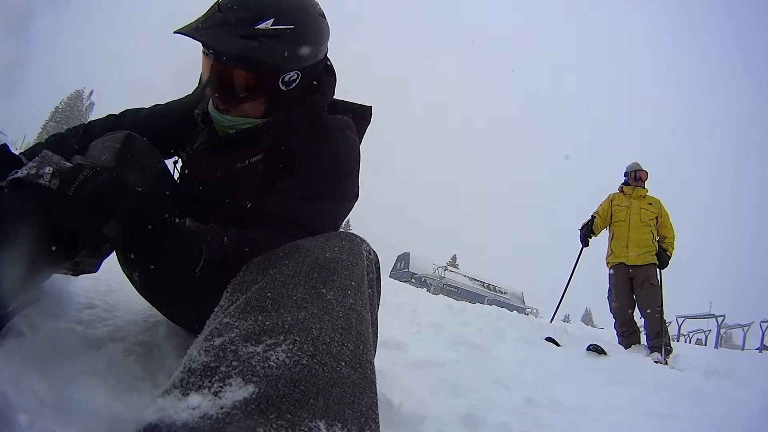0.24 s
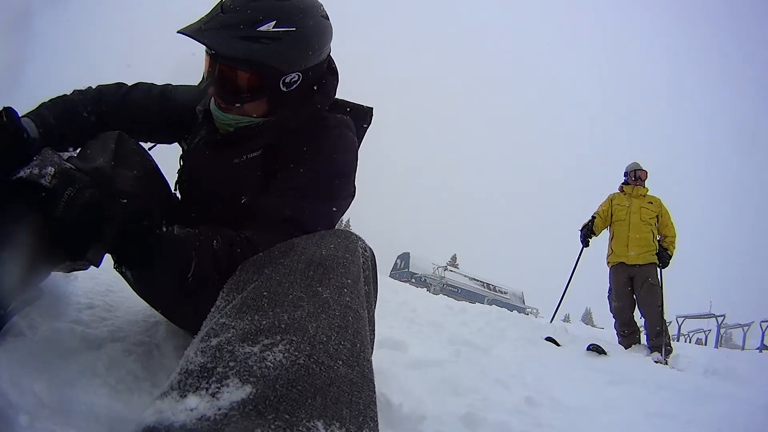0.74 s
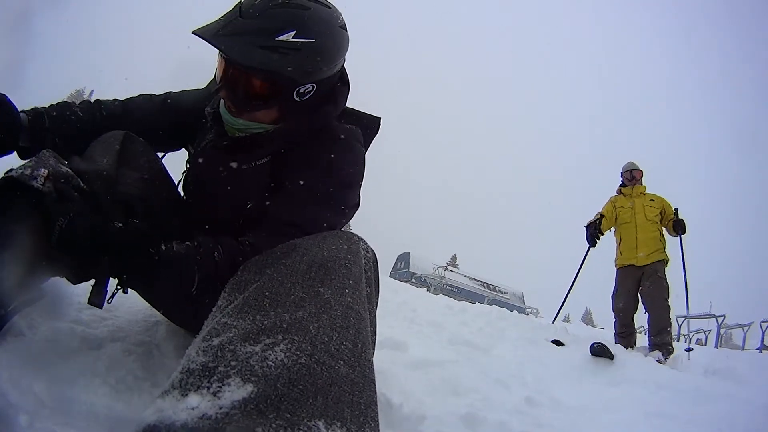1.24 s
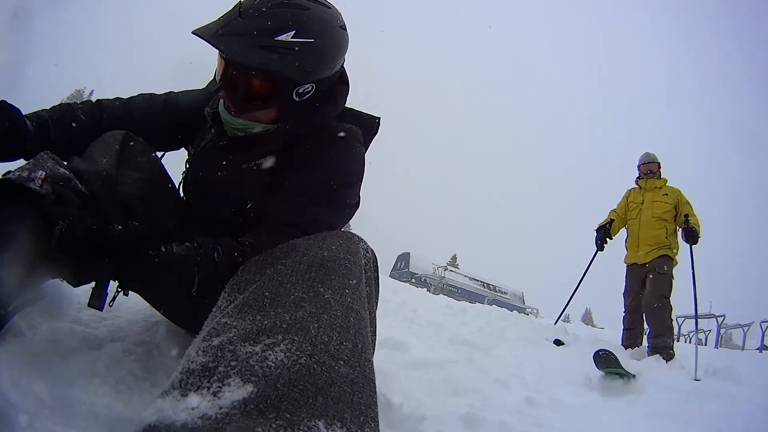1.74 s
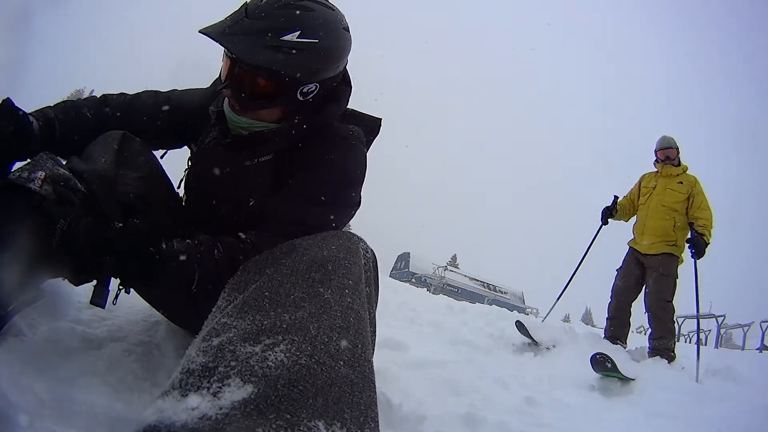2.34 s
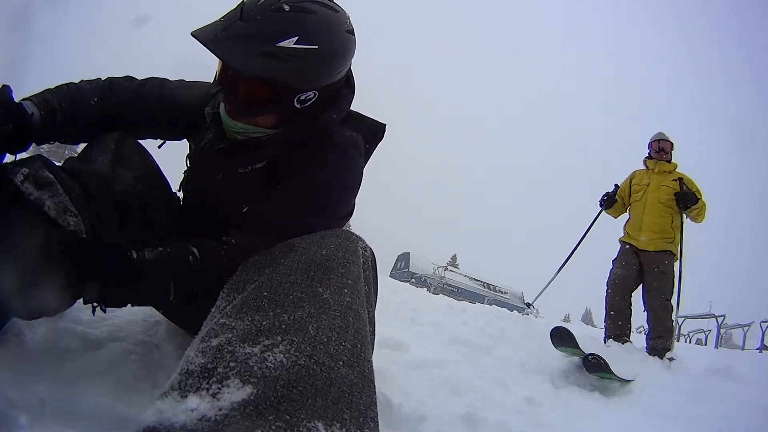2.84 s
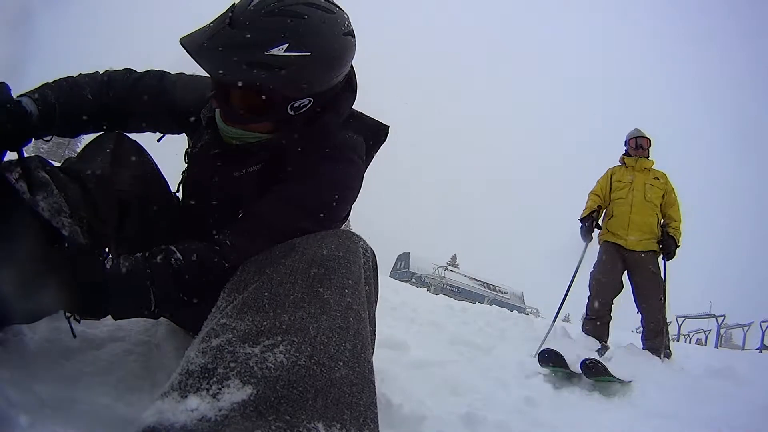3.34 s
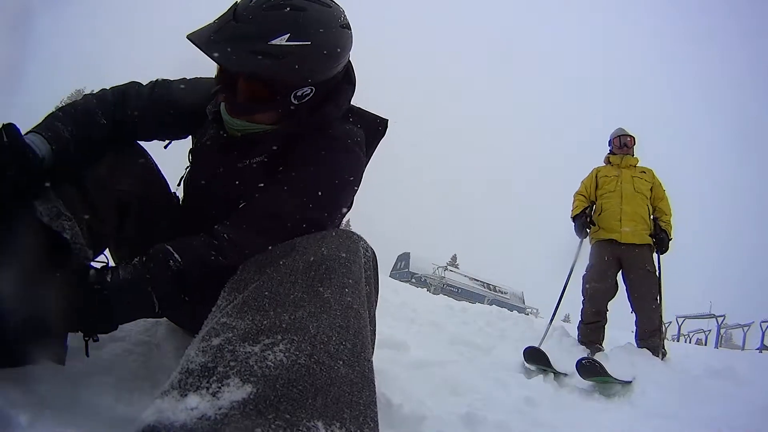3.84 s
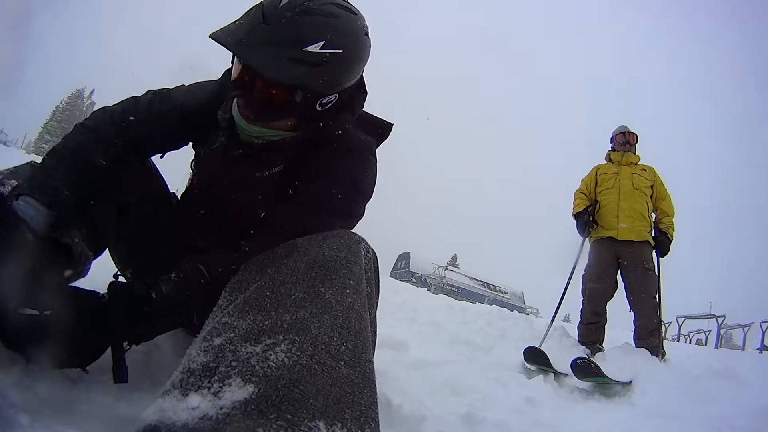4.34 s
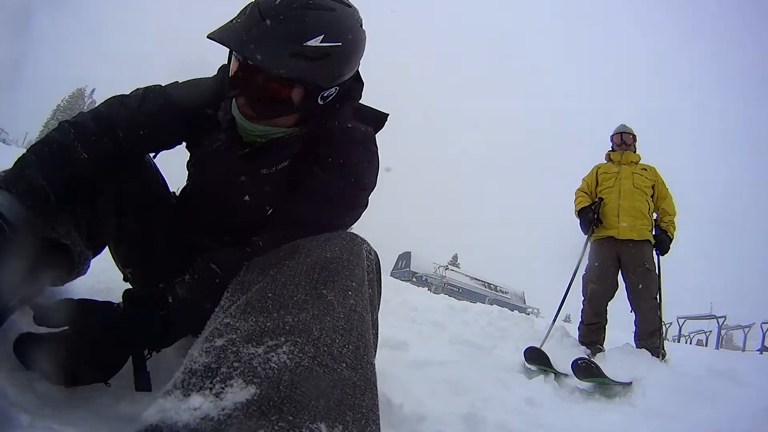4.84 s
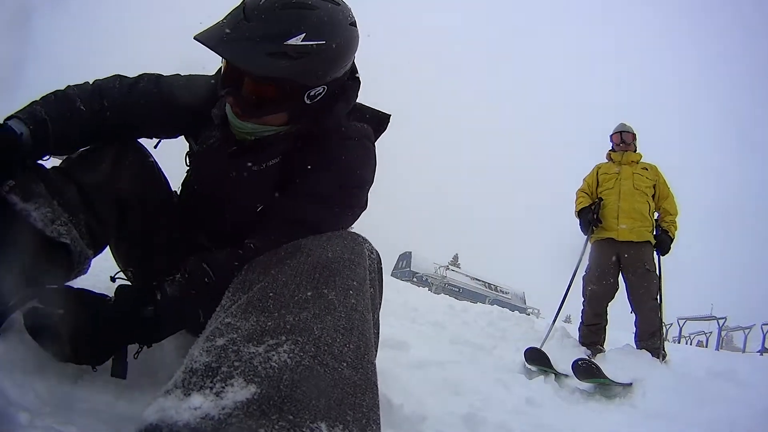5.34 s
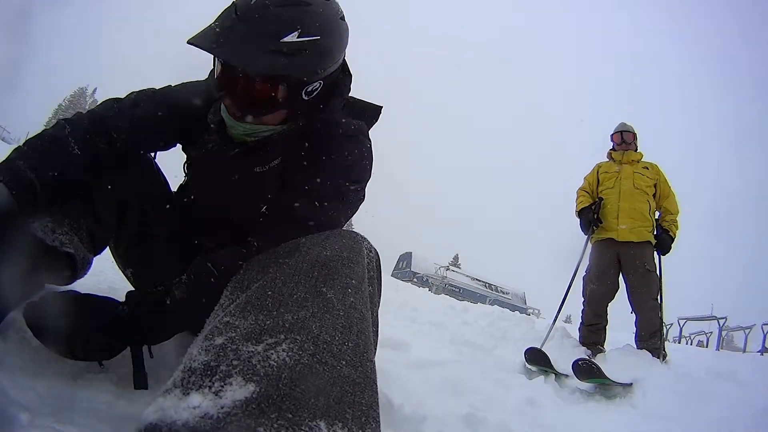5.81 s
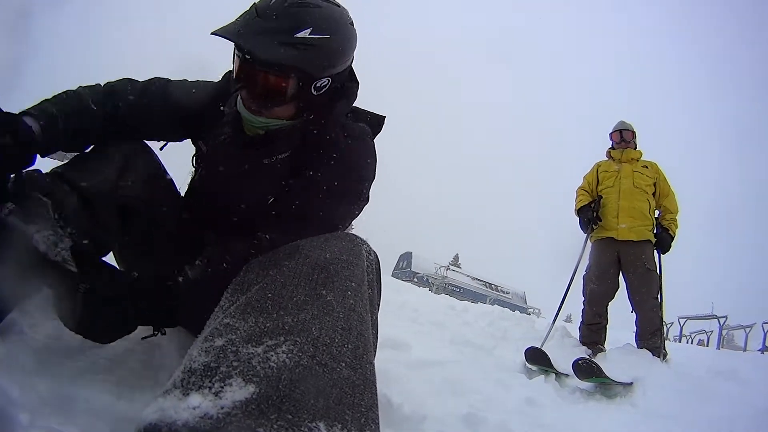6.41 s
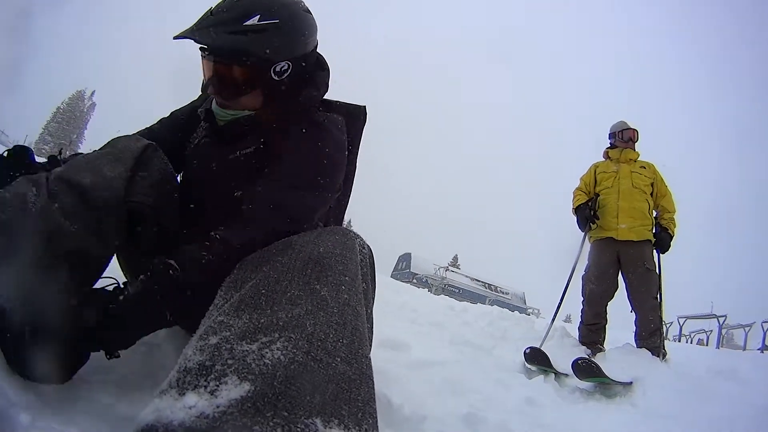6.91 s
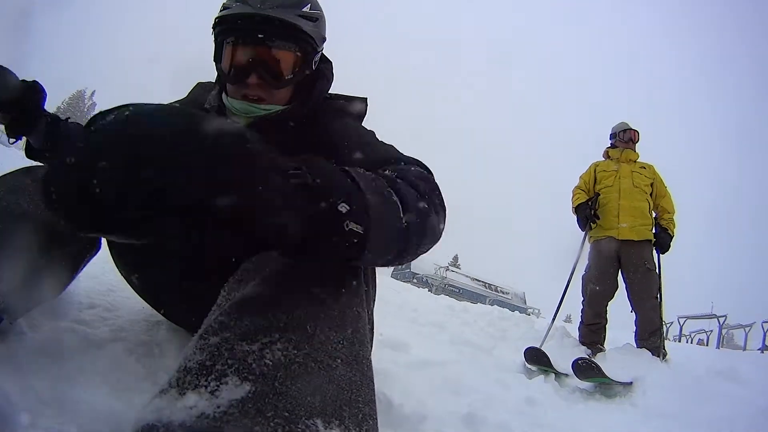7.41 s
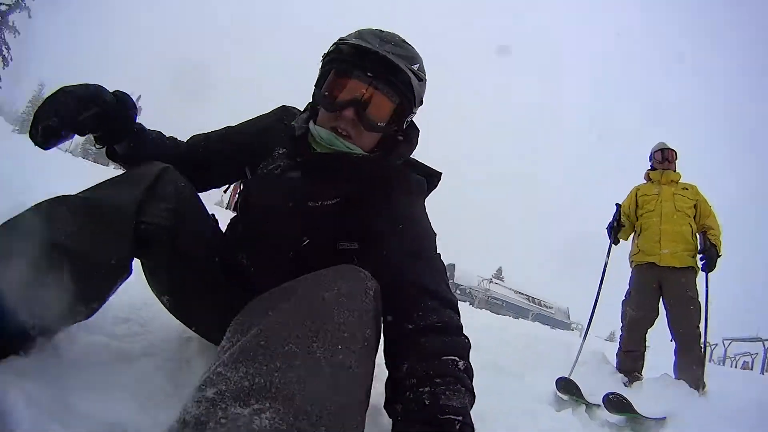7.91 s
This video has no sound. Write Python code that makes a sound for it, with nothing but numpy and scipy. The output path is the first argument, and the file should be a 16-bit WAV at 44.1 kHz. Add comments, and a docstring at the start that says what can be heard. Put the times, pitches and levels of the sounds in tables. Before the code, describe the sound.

Close, rough handling noise in snow: dull thumps, dry creaks, sharp plastic cracks, brief squeaks and jacket scuffs, quiet first, busier later.

```python
"""A snowboarder sits and shifts in deep snow, heard through a case fixed low to the gear; about 8 s.
Shoves crunch the snow, rub the case and drag the jacket; a squeak, knocks and ticking grains come early.
From 1.7 s the board judders in short runs, from 3 s snow creaks, and from 3.6 to 7.3 s plastic snaps.
Snow slumps at 5.8 and 7.8 s, a sleeve sweeps from 6.6 s, a glove brushes at 7.7 s, and grains flurry near 8 s.
Impulses and noise drive resonances of snow, board, mount, case and shell, over a faint coloured hiss."""
import sys
import numpy as np
from scipy import signal
from scipy.fft import rfft, irfft, next_fast_len
from scipy.io import wavfile
from scipy.ndimage import uniform_filter1d

SR = 44100
rng = np.random.default_rng(int(sys.argv[2]) if len(sys.argv) > 2 else 0)


def to_wav(s):
    """Save 16-bit WAV."""
    ch = np.atleast_2d(s).T  # columns
    pcm = np.round(np.clip(ch, -1, 1) * 32767)  # PCM
    wavfile.write(sys.argv[1], SR, pcm.astype(np.int16))


N = 359838
TIME = np.arange(N) / SR

# resonances of the snow beneath: centre_hz, width_hz, gain_db
SNOWPACK_MODES = [(47.6, 17, -0.5), (82.2, 20, 4), (122, 24.6, 7.5)]
# resonances of the loaded board: centre_hz, width_hz, gain_db
BOARD_MODES = [(141, 44, -5.5), (170.7, 29.4, 2), (223, 42, -0.5), (398.4, 89, -12.5)]
# resonances of the mount between board and case: centre_hz, width_hz, gain_db
MOUNT_MODES = [(479.6, 36, 1.5), (625.5, 64, 7), (745.5, 89, -1.5), (888, 41.5, -1.5), (1015, 43, -11),
               (1219, 92, -11.5)]
# resonances of the case when struck: centre_hz, width_hz, gain_db
STRUCK_CASE_MODES = [(1441, 74, 17.5), (1477, 410, 7.5), (1875, 123, 7), (2900, 600, -4.5)]
# resonances of the hard plastic shell: centre_hz, width_hz, gain_db
SHELL_MODES = [(1600, 360, 9), (2980, 210, 8), (4716, 470, 9.5), (5840, 910, -6.5), (6780, 790, -1.5),
               (8050, 2350, -1.5), (9390, 1500, -4.5)]


def effort():
    """Weight on the snow and rubbing on the case, in dB: shoves standing out of a restless pressure."""
    # shoves of the body against snow and gear: start_s, length_s, weight_db, rub_db
    shoves = [(0.067, 0.072, -40.5, -35), (0.279, 0.069, -38.5, -58), (0.598, 0.081, -46.5, -56),
              (0.724, 0.081, -44.5, -61.5), (3.788, 0.039, -23.5, -34), (4.228, 0.098, -36, -49),
              (4.673, .03, -37.5, -41.5), (4.717, 0.07, -23, -33), (4.827, 0.13, -45, -42.5),
              (5.292, 0.037, -45.5, -47.5), (5.604, 0.22, -30.5, -37), (5.684, 0.11, -24, -30.5),
              (5.907, 0.07, -26.5, -35.5), (6.022, 0.013, -27, -39), (6.133, .05, -32, -36.5),
              (6.189, 0.076, -21, -25), (6.292, 0.16, -33.5, -34.5), (6.616, 0.048, -29.5, -38.5),
              (6.805, 0.029, -38, -36.5), (6.967, 0.0092, -29.5, -38), (7.019, 0.016, -32.5, -30.5),
              (7.226, 0.011, -37, -33), (7.702, 0.079, -24.5, -21), (7.93, 0.023, -35.5, -45),
              (8.04, 0.12, -41.5, -44.5)]
    # restless pressure between the shoves: time_s, level_db
    unrest = [(0.0, -41), (0.95, -64.5), (3.48, -56.5), (4.55, -41), (4.95, -37), (5.25, -50.5),
              (5.61, -56), (5.79, -39.5), (6.86, -37.5), (7.59, -55), (7.84, -36.5), (8.16, -51)]
    unrest_weight_db, unrest_rub_db = -3.5, -14   # relative to the pressure
    unrest_db, = in_time(unrest)
    weights = [(s, length_s, weight_db) for s, length_s, weight_db, _ in shoves]
    rubs = [(s, length_s, rub_db) for s, length_s, _, rub_db in shoves]
    weight_db = strokes(weights, rise_db_per_s=633, fall_db_per_s=305)
    rub_db = strokes(rubs, rise_db_per_s=553, fall_db_per_s=479)
    return np.maximum(weight_db, unrest_db + unrest_weight_db), np.maximum(rub_db, unrest_db + unrest_rub_db)


def shuffling(weight_db, rub_db):
    """Snow gives way in small collapses that shake snow, board, mount and case; finer friction adds rubbing."""
    # resonances of the rubbed case: centre_hz, width_hz, gain_db
    case_modes = [(1421, 93, 1), (1786, 133, 7), (1888, 100, 1.5), (2920, 93, -13)]
    full_weight_db, full_collapses_per_s = -22, 260
    density_share = .45   # share of the weight's swing in dB
    # more weight, denser crunch
    per_s = full_collapses_per_s * from_db(density_share * (weight_db - full_weight_db))
    collapses = slips(per_s, spread_db=2.0)
    friction = slips(per_s=3000, spread_db=3.0)

    heave = evened(resonate(collapses, SNOWPACK_MODES, wander_db=9.5), window_s=.0077)
    heave = from_db(1.06 * weight_db) * heave   # heavy pushes sound deeper
    board = evened(resonate(collapses, BOARD_MODES, wander_db=5.0), window_s=.023)
    board = from_db(weight_db) * board
    mount_push = collapses + from_db(-18) * friction
    mount = evened(resonate(mount_push, MOUNT_MODES, wander_db=4.5), window_s=.035)
    mount = from_db((weight_db + rub_db) / 2 - 1.5) * mount   # it joins board and case, so both drive it
    case_push = collapses + from_db(-19.5) * friction
    case = evened(resonate(case_push, case_modes, wander_db=5.5), window_s=.046)
    case = from_db(rub_db) * case
    return heave + board + mount + case


def slumps():
    """Deep snow gives way all at once under the weight, with a dull thud."""
    # slumps: start_s, peak_db
    slump_rows = [(5.752, -13.5), (7.752, -14.5)]
    # resonances of the slumping snow: centre_hz, width_hz, gain_db
    slump_modes = [(47.3, 7.7, 2.5), (83.5, 35, 2.5)]
    out = np.zeros((2, N))
    for s, peak_db in slump_rows:
        thud = peak_one(resonate(blow(decay_s=.037, grit=.87), slump_modes))
        add(out, s, from_db(peak_db) * thud)
    return out


def knocks():
    """Blows on packed snow ring board, mount and case; the heavy board and the snow shake longest."""
    # board knocks: start_s, mount_db, board_over_mount_db
    knock_rows = [(0.308, -40.5, 8), (0.588, -31.5, -15), (0.793, -45.5, 13.5), (2.037, -38.5, -0.5),
                  (2.221, -38, -2), (2.280, -26, 0), (2.334, -24.5, -2), (2.376, -36.5, -7),
                  (2.462, -32.5, 3), (2.681, -33, -3.5), (2.962, -39, 6), (3.583, -13, -3.5),
                  (3.973, -35.5, 10), (4.069, -29, -6), (4.138, -24, 4), (4.38, -32, 6.5),
                  (4.458, -46.5, 14.5), (4.487, -45, 17), (4.515, -53.5, 16), (4.582, -33.5, 7.5),
                  (4.635, -34, 7), (4.914, -18, 1), (4.953, -22.5, 6), (4.985, -25, 7.5), (5.025, -27, 7.5),
                  (5.14, -25, -1.5), (6.011, -24, -2), (7.026, -18, -5), (7.266, -16, -3.5)]
    case_rel_db, grit_rel_db = -4.5, -18   # relative to the mount
    thud_rel_db = -11   # relative to the board
    out = np.zeros((2, N))
    for s, mount_db, heavy_db in knock_rows:
        board_db = mount_db + heavy_db
        board = peak_one(resonate(blow(decay_s=.01, grit=1.0), BOARD_MODES))
        mount = peak_one(resonate(blow(decay_s=.011, grit=.5), MOUNT_MODES))
        case = peak_one(resonate(blow(decay_s=.0047, grit=1.0), STRUCK_CASE_MODES))
        thud = peak_one(resonate(blow(decay_s=.013, grit=.6), SNOWPACK_MODES))
        low = from_db(board_db) * board + from_db(board_db + thud_rel_db) * thud
        high = from_db(mount_db) * mount + from_db(mount_db + case_rel_db) * case
        add(out, s, low + high)
        add(out, s, from_db(mount_db + grit_rel_db) * tick(decay_s=.0044))   # crumbs on the shell
    return out


def judders():
    """Snow sticks and slips in a quick, nearly regular run; board and mount groan, the freed board rings on."""
    # judders: start_s, length_s, slips_per_s, board_db, mount_db
    judder_rows = [(1.694, .022, 205, -18.5, -14), (1.786, .03, 185, -20.5, -31),
                   (3.773, .062, 182, -12.5, -29), (6.208, .02, 140, -10, -38),
                   (7.319, .011, 222, -19, -26)]
    # resonances of the freed board: centre_hz, width_hz, gain_db
    free_board_modes = [(107, 9, 10), (247, 6.7, -10), (756, 11, -8)]
    case_rel_db, ring_on_rel_db = -6.5, -10   # relative to the mount; to the board
    fade_db = 7   # mean drop in slip force over a whole run
    soft_board_hz, soft_mount_hz = 260, 1700
    out, size = np.zeros((2, N)), SR // 3
    for s, length_s, per_s, board_db, mount_db in judder_rows:
        count = int(length_s * per_s) + 1
        at_s = np.abs(np.arange(count) + rng.normal(0, .08, count)) / per_s
        force_db = rng.normal(0, 2, (2, count)) - fade_db * at_s / length_s
        run = np.zeros((2, size))
        run[:, (at_s * SR).astype(int)] = from_db(force_db)
        decay = signal.lfilter([1], [1, -np.exp(-1 / (.0015 * SR))], run)   # 1.5 ms after each slip
        crumbling = decay * rng.standard_normal((2, size))
        gritty = cushioned(run + from_db(-17) * crumbling, soft_mount_hz)

        board = peak_one(resonate(cushioned(run, soft_board_hz), BOARD_MODES))
        mount = peak_one(resonate(gritty, MOUNT_MODES))
        case = peak_one(resonate(gritty, STRUCK_CASE_MODES))
        upper = mount + from_db(case_rel_db) * case
        add(out, s, from_db(board_db) * board + from_db(mount_db) * upper)

        release = np.tile(signal.unit_impulse(size), (2, 1))
        ring_on = peak_one(resonate(release, free_board_modes))
        add(out, s + at_s[-1], from_db(board_db + ring_on_rel_db) * ring_on)
    return out


def creaks():
    """Each single sharp slip of cold snow is a dry, hollow pop with a little shake of the board."""
    # creaks: start_s, pop_peak_db
    creak_rows = [(2.986, -36.5), (3.825, -19), (5.073, -29.5), (6.488, -19), (6.510, -20.5),
                  (6.533, -26.5), (6.559, -27), (6.6, -23), (6.658, -30), (6.680, -27.5), (6.718, -24.5),
                  (6.813, -23.5), (6.853, -22.5), (6.984, -19)]
    # resonance of the pop: centre_hz, width_hz, gain_db
    pop_modes = [(540, 194, 0)]
    board_rel_db = -6.5
    out = np.zeros((2, N))
    for s, peak_db in creak_rows:
        push = blow(decay_s=.008, grit=.35)
        pop = peak_one(resonate(push, pop_modes))
        board = peak_one(resonate(push, BOARD_MODES))
        add(out, s, from_db(peak_db) * (pop + from_db(board_rel_db) * board))
    return out


def squeaks():
    """Stick and slip make the case wall sing: a clear note when locked, a mount-shaking rasp when not."""
    # squeaks: start_s, wall_rms_db, length_s, roughness_0_to_1
    squeak_rows = [(0.071, -27.5, 0.0047, .8), (0.113, -27, 0.016, 0.32), (0.221, -30.5, 0.0043, 0.56),
                   (3.994, -30, 0.033, 0.86), (4.01, -16, 0.003, 0.3), (4.855, -29, 0.023, 0.73),
                   (5.921, -15, 0.027, 0.56), (6.441, -17, 0.0036, 1), (6.454, -16.5, 0.0044, 0.11),
                   (7.012, -22.5, 0.0045, 0.7), (7.296, -22, 0.0058, .8), (7.709, -19.5, 0.014, 0.83),
                   (7.731, -26, 0.018, 0.35), (7.778, -18, 0.01, 0.9), (7.808, -22, 0.013, 0.2),
                   (7.827, -12.5, 0.008, 0.25)]
    wall_hz, wall_width_hz, ring_s = 1770, 120, .002
    out, t = np.zeros((2, N)), TIME[:SR // 12]
    note = np.sin(2 * np.pi * wall_hz * t)
    for s, rms_db, length_s, rough in squeak_rows:
        run = slips(per_s=6800, spread_db=1.5, size=len(t))
        rasp = evened(resonate(run, [(wall_hz, wall_width_hz, 0)]), window_s=.015)
        onset = 1 - np.exp(-2 * t / ring_s)
        grip = onset * np.exp(-np.maximum(t - length_s, 0) / ring_s)
        wall = rms_one(((1 - rough) * note + rough * rasp) * grip)
        mount = rough * from_db(-3.0) * rms_one(resonate(run * (t < length_s), MOUNT_MODES))
        to_length = np.sqrt(length_s / t[-1])   # refer the rms to the squeak's own length
        add(out, s, from_db(rms_db) * (wall + mount) * to_length)
    return out


def snaps():
    """Strained plastic lets go with a few milliseconds of crack and one ring of its own pitch."""
    # plastic snaps: start_s, level_db
    snap_rows = [(3.5818, -17), (4.1588, -8.5), (4.2214, -11.5), (4.2743, -10), (4.682, -11), (4.7225, -9),
                 (4.759, -12), (5.659, -8.5), (5.7188, -12), (5.7915, -11.5), (6.231, -13), (6.4409, -14.5),
                 (7.2661, -15)]
    ring_hz, scatter_hz, ring_width_hz = 5170, 260, 220
    jolt_rel_db = -8   # board and mount, relative to the shell
    out, t = np.zeros((2, N)), TIME[:SR // 25]
    envelope = np.exp(-(t / .0026) ** 4) + from_db(-2.0) * np.exp(-t / .0035)
    for s, level_db in snap_rows:
        own_hz = rng.normal(ring_hz, scatter_hz)
        crack = rng.standard_normal((2, len(t))) * envelope
        shell = rms_one(resonate(crack, SHELL_MODES))
        ring = from_db(-5.0) * rms_one(resonate(crack, [(own_hz, ring_width_hz, 0)]))
        jolt = rms_one(resonate(crack, BOARD_MODES) + resonate(crack, MOUNT_MODES))
        add(out, s, from_db(level_db - 23) * (shell + ring + from_db(jolt_rel_db) * jolt))
    return out


def snow_grains():
    """Grains of snow tick on the shell: single large ones, and fine ones that thicken to a late flurry."""
    # large grains: start_s, peak_db
    large_grains = [(0.3254, -27), (0.7807, -27.5), (0.9532, -33), (1.186, -33), (1.206, -32.5),
                    (1.3114, -37), (1.449, -34), (1.8416, -31.5), (2.01, -35.5), (2.4925, -30),
                    (2.6287, -35), (3.14, -32), (3.2083, -27.5), (3.459, -37), (3.823, -25), (7.9762, -17),
                    (7.991, -22.5), (8.078, -21)]
    # flying snow, end values held: time_s, grains_per_s, median_peak_db
    flying_snow = [(7.89, 27, -40.5), (7.97, 560, -30.5), (8.16, 140, -39)]
    out = np.zeros((2, N))
    for s, peak_db in large_grains:
        add(out, s, from_db(peak_db) * tick(decay_s=.0033))
    per_s, size_db = in_time(flying_snow)
    for i in np.flatnonzero(rng.random(N) < per_s / SR):
        peak_db = size_db[i] + rng.normal(0, 5.1)
        add(out, i / SR, from_db(peak_db) * tick(decay_s=.0013))
    return out


def glove():
    """A glove brushes over the shell: dense slips of threads make a smooth, bright hiss."""
    # brushes: start_s, length_s, level_db
    brushes = [(7.662, 0.015, -38.5)]
    threads = slips(per_s=30000, spread_db=1)
    gain = from_db(strokes(brushes, rise_db_per_s=3000, fall_db_per_s=88))
    return gain * rms_one(resonate(threads, SHELL_MODES[:3]))


def jacket(rub_db):
    """Threads of stiff fabric catch thousands of times a second, louder in shoves and sleeve sweeps."""
    # sweeps of the sleeves: start_s, length_s, level_db
    sweeps = [(0.85, .3, -58), (6.55, 1, -49.5), (7.36, 0.14, -43), (7.69, 0.19, -41), (7.95, 0.29, -59)]
    # fabric colour: frequency_hz, relative_level_db
    fabric_colour = [(500, -20), (1100, -12.5), (1800, 5.5), (2400, -7), (2950, -1.5), (3700, -12.5),
                     (4700, -5), (6000, -16.5), (8200, -17.5), (11000, -29)]
    full_rub_db, full_drag_db = -30, -43.5
    drag_share = .44   # share of the rub's swing in dB
    dragged = from_db(full_drag_db + drag_share * (rub_db - full_rub_db))
    swept = from_db(strokes(sweeps, rise_db_per_s=194, fall_db_per_s=88))
    threads = slips(per_s=12000, spread_db=4.5)
    return np.hypot(dragged, swept) * coloured(threads, fabric_colour)


def hiss():
    """Faint steady noise, strongest in the bass."""
    # hiss colour: frequency_hz, relative_level_db
    hiss_colour = [(25, -2), (60, 12.5), (180, 7.5), (620, -2.5), (1100, -4.5), (1750, 1.5), (2400, -7),
                   (4700, -7.5), (11000, -12)]
    rms_db = -56.5
    return from_db(rms_db) * coloured(rng.standard_normal((2, N)), hiss_colour)


def ports(paths):
    """One path is common to both microphone ports, one opposed; the case shifts phase, the sum keeps its level."""
    # microphone ports in the case: frequency_hz, left_lead_rad, likeness_0_to_1
    port_rows = [(50, -.6, .9), (200, -.7, .9), (310, -1.2, .65), (450, -2.2, .78), (680, -1.8, .7),
                 (1000, -1.8, .45), (1450, 0, .85), (1800, 0, .98), (2400, .3, .65), (2950, 1.4, .8),
                 (3700, 2.4, .35), (4700, .1, .92), (6200, 0, .4), (7400, -1.4, .5), (11000, -1, .1)]
    size = next_fast_len(N + SR // 10)
    hz = np.arange(size // 2 + 1) * SR / size
    lead_rad = at_hz(port_rows, hz, column=1)
    alike = np.clip(at_hz(port_rows, hz, column=2), 0, .99)
    common, opposed = rfft(paths, size)
    sides = np.array([[1], [-1]])
    pair = np.sqrt(1 + alike) * common + sides * np.sqrt(1 - alike) * opposed
    pair = pair * np.exp(.5j * sides * lead_rad)
    return irfft(pair / np.sqrt(1 + alike * np.cos(lead_rad)), size)[:, :N]


def slips(per_s, spread_db, size=N):
    """Random tiny slips of uneven force, reaching the ports by two paths, each with its own strength."""
    happens = rng.random(size) < per_s / SR
    force = happens * from_db(spread_db * np.minimum(rng.exponential(1, size), 4))
    return force * rng.standard_normal((2, size))


def burst(decay_s, size):
    """A contact that crumbles away: noise dying fast."""
    return rng.standard_normal((2, size)) * np.exp(-np.arange(size) / SR / decay_s)


def blow(decay_s, grit):
    """One clean impact with the grit of snow crumbling under it."""
    push = grit * burst(decay_s, size=SR // 5) / np.sqrt(decay_s * SR / 2)
    push[0, 0] += 1   # the impact takes the common path
    return push


def tick(decay_s):
    """A grain hits the shell, and every spot rings differently; peak 1."""
    spot = [(hz, width_hz, db + rng.normal(0, 4.9)) for hz, width_hz, db in SHELL_MODES]
    return peak_one(resonate(burst(decay_s, size=SR // 50), spot))


def cushioned(push, hz):
    """Snow cushions a push and takes its edge off: low-pass."""
    return signal.sosfilt(signal.butter(2, hz, fs=SR, output="sos"), push + 1e-18)


def resonate(x, modes, wander_db=None):
    """Parallel resonances, outer skirts cut; a moving contact favours now one mode, now another."""
    out = 0
    for k, (hz, width_hz, db) in enumerate(modes):
        r = np.exp(-np.pi * width_hz / SR)
        push = x if wander_db is None else x * wander(wander_db, x.shape[-1])
        zeros = [(1 - r * r) / 2, 0, (r * r - 1) / 2]
        poles = [1, -2 * r * np.cos(2 * np.pi * hz / SR), r * r]
        # alternate signs between neighbouring modes
        out = out + (-1) ** k * from_db(db) * signal.lfilter(zeros, poles, push + 1e-18)
    edges_hz = [modes[0][0] * .65, min(modes[-1][0] * 1.5, .45 * SR)]
    return signal.sosfilt(signal.butter(2, edges_hz, "band", fs=SR, output="sos"), out)


def wander(depth_db, size):
    """A gain that glides to a new random value thirty times a second."""
    steps = np.arange(size) * 30 / SR
    count = int(steps[-1]) + 2
    return np.interp(steps, np.arange(count), from_db(rng.normal(0, depth_db, count)))


def evened(x, window_s):
    """Hold the level steady over a window and keep the grain within it."""
    size = max(int(window_s * SR), 2)
    power = uniform_filter1d(uniform_filter1d(x ** 2, size), size)
    return x / np.sqrt(np.abs(power) + 1e-4 * np.mean(x ** 2))


def coloured(x, spectrum):
    """Give a signal a spectrum; rms 1."""
    size = next_fast_len(N)
    hz = np.arange(size // 2 + 1) * SR / size
    return rms_one(irfft(rfft(x, size) * from_db(at_hz(spectrum, hz)), size)[:, :N])


def strokes(rows, rise_db_per_s, fall_db_per_s):
    """Level in dB of (start_s, length_s, level_db) movements: each swells, holds and dies away."""
    t = TIME[::32]
    levels_db = []
    for s, length_s, db in rows:
        before_s, after_s = np.maximum(s - t, 0), np.maximum(t - s - length_s, 0)
        levels_db.append(db - rise_db_per_s * before_s - fall_db_per_s * after_s)
    return np.interp(TIME, t, np.max(levels_db, axis=0))


def in_time(rows):
    """The columns of a curve at every sample."""
    s, *columns = np.transpose(rows)
    return [np.interp(TIME, s, column) for column in columns]


def at_hz(points, hz, column=1):
    """Read a table along log frequency."""
    points = np.array(points)
    return np.interp(np.log(hz + 1), np.log(points[:, 0]), points[:, column])


def from_db(db):
    """Decibels to gain."""
    return 10 ** (np.asarray(db) / 20)


def rms_one(x):
    """Scale each channel to rms 1."""
    return x / np.sqrt(np.mean(x ** 2, axis=-1, keepdims=True) + 1e-20)


def peak_one(x):
    """Scale each channel to peak 1."""
    return x / np.abs(x).max(axis=-1, keepdims=True)


def add(out, s, sound):
    """Mix a sound in at time s."""
    start = max(round(s * SR), 0)
    out[:, start:start + sound.shape[1]] += sound[:, :max(N - start, 0)]


def scene():
    """Everything reaches the microphones through the case; open snow gives no echo."""
    weight_db, rub_db = effort()
    snow_and_board = shuffling(weight_db, rub_db) + slumps() + knocks() + judders() + creaks()
    plastic = squeaks() + snaps() + snow_grains() + glove()
    return ports(snow_and_board + plastic + jacket(rub_db) + hiss())


def record(dry):
    """Peaks are rounded and the top is cut by a steep low-pass."""
    cutoff_hz = 11100
    low_pass = signal.ellip(10, .2, 70, cutoff_hz, fs=SR, output="sos")   # ripple dB, stop-band dB
    return signal.sosfilt(low_pass, np.tanh(dry))


dry = scene()
out = record(dry)
to_wav(out)
```